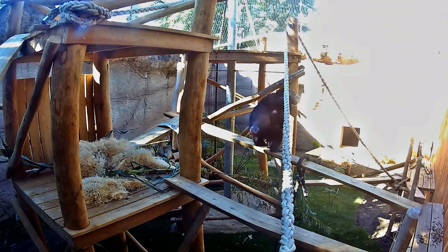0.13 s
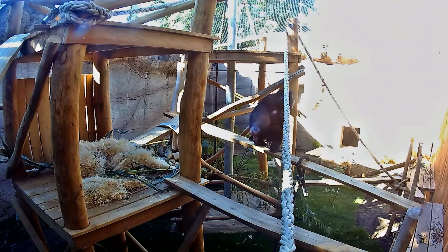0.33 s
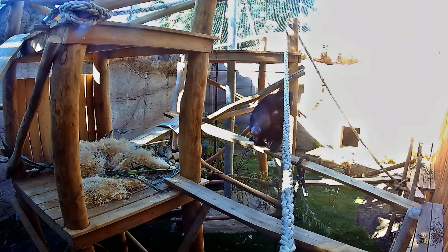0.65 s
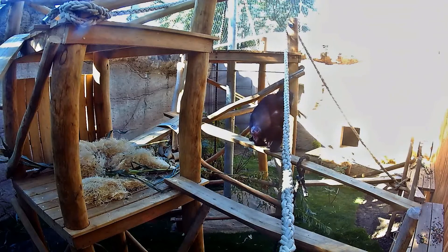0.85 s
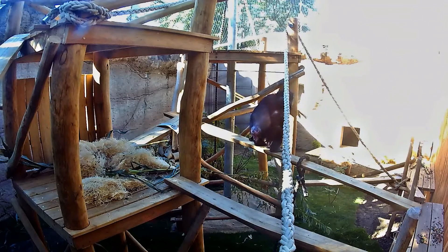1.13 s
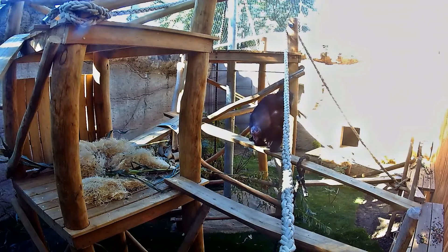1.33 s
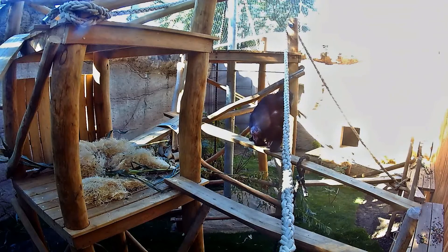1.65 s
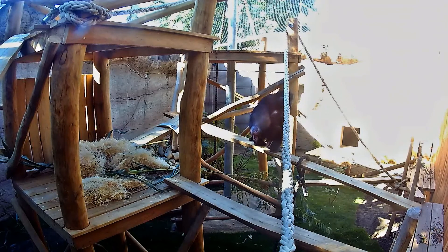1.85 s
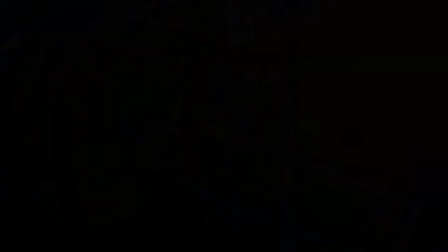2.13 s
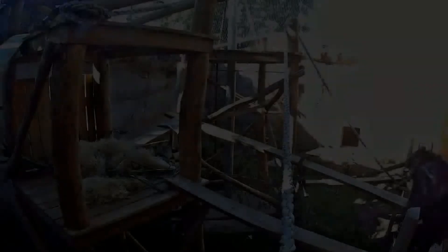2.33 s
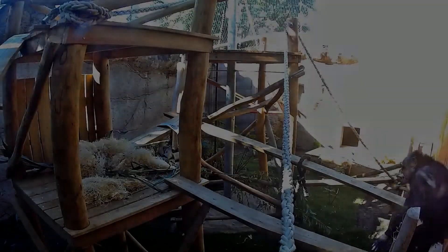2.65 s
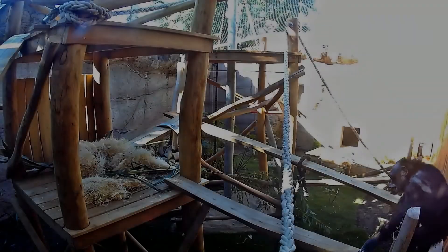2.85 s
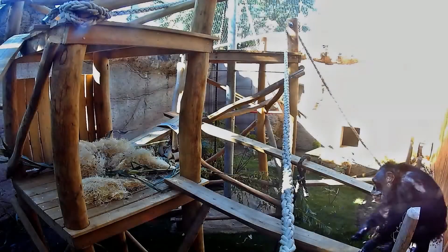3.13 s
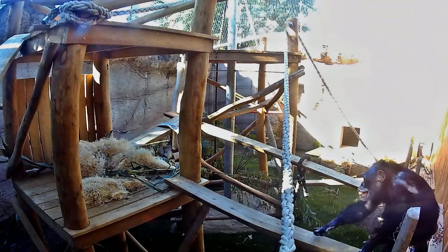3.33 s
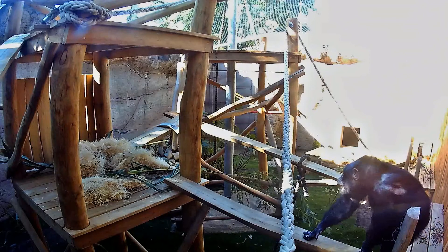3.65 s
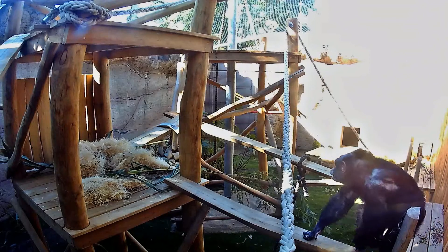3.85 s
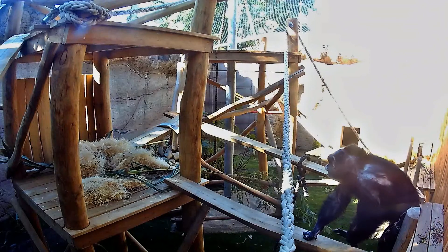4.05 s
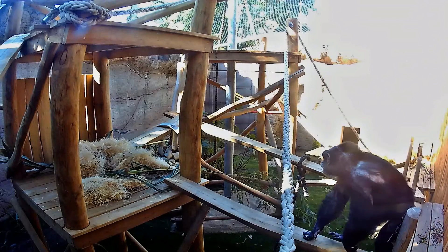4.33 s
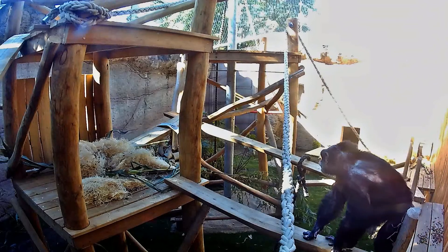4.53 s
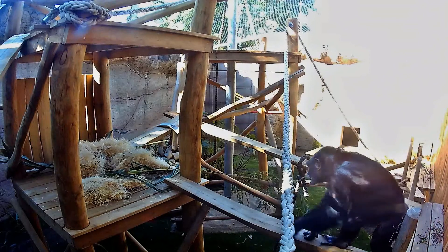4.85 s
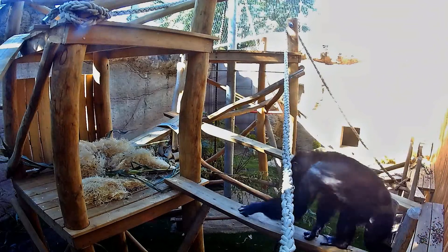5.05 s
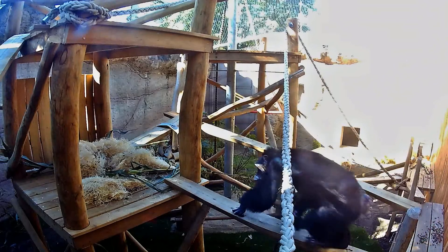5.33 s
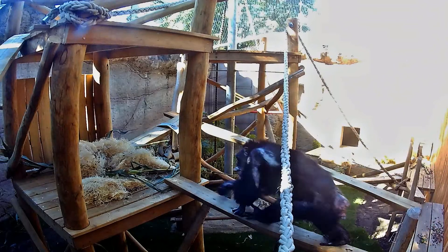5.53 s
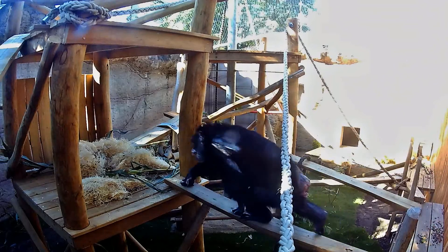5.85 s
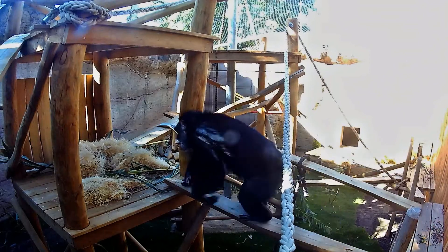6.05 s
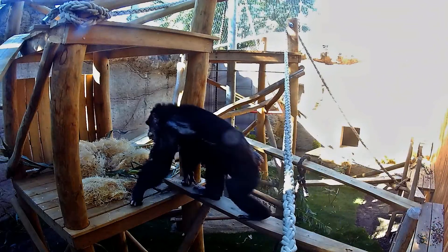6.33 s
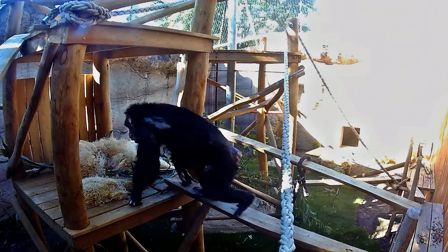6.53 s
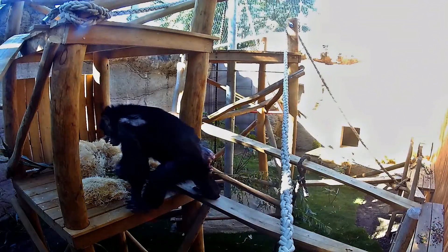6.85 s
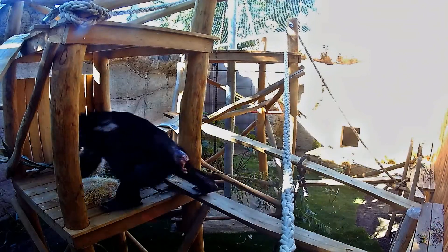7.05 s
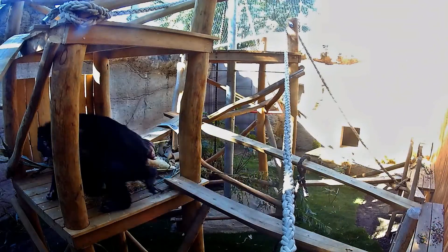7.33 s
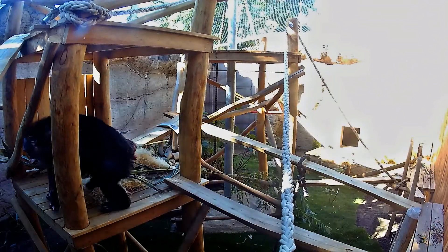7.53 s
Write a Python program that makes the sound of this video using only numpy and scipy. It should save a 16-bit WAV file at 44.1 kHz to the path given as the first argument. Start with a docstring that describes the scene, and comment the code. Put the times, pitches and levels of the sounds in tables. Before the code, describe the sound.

Loud, high chimpanzee screams with raspy, squealing in-breaths ring off hard walls, the strongest ones overloading the microphone over faint outdoor rumble and hiss.

```python
"""Chimpanzee screams in a walled enclosure

Arching harmonic screams alternate with hoarse rasps, bands of tone and noise at the throat's resonances.
Walls return discrete echoes and a diffuse tail; the loudest calls overload the microphone input.
A hard cut shortens one scream: before it the callers are farther off and more reverberant.
Squeals, faint falling tones, a soft knock on wood and electronic pips are heard over rumble and hiss."""
import sys
import numpy as np
from scipy import signal
from scipy.fft import rfft, irfft, next_fast_len
from scipy.io import wavfile
from scipy.ndimage import uniform_filter1d, minimum_filter1d

SR = 44100
rng = np.random.default_rng(int(sys.argv[2]) if len(sys.argv) > 2 else 0)


def transcribe(u):
    """Save the signal u as a 16-bit wav file named by the first command-line argument.

    u: samples, shape (n,) or (channels, n), limited to [-1, 1]; the rate is SR.
    q: integer samples, one column per channel.
    """
    v = np.clip(np.atleast_2d(u).T, -1, 1)
    q = np.round(v * 32767).astype(np.int16)
    wavfile.write(sys.argv[1], SR, q)


N = 339129
CUT_S = 2.128  # the first shot gives way to the second


def amp(db):
    """Logarithmic level: decibels to amplitude gain."""
    return 10 ** (np.asarray(db) / 20)


def unit(x):
    """Normalisation to an rms of 1."""
    return x / np.sqrt(np.mean(abs(x) ** 2) + 1e-20)


def ramp(x):
    """Linear ramp limited to 0-1."""
    return np.clip(x, 0, 1)


def read(points, hz):
    """Interpolation of a spectral table on a log-frequency axis."""
    f, value = np.transpose(points)
    return np.interp(np.log(hz + 1), np.log(f + 1), value)


def add(mix, s, sound):
    """Superposition: adds a sound to the mix at time s, dropping what lies outside."""
    at = round(s * SR)
    sound = sound[max(-at, 0):]
    part = mix[max(at, 0):][:len(sound)]
    part += sound[:len(part)]


def fade(t, edge_s):
    """Sine-squared window edges avoid clicks at start and end."""
    return np.sin(np.pi / 2 * np.clip(np.minimum(t - t[0], t[-1] - t) / edge_s, 0, 1)) ** 2


def noise(size, shape):
    """Spectral shaping: white noise weighted by shape(Hz), at an rms of 1."""
    full = next_fast_len(size + 4096)
    spectrum = rfft(rng.standard_normal(full)) * shape(np.fft.rfftfreq(full, 1 / SR))
    return unit(irfft(spectrum, full)[:size])


def wander(t, rate_hz):
    """Low-pass noise: random drift up to about the given rate."""
    return noise(len(t), lambda hz: 1 / (1 + (hz / rate_hz) ** 4))


def background():
    """Coloured noise: a low outdoor rumble and a soft hiss, gently modulated together."""
    # spectrum of the outdoor rumble: (f/Hz, relative level/dB)
    air_spectrum = [(15, -43.5), (25, -25), (49, 0), (86, -10), (113, -6), (189, -9), (227, -3), (265, -3),
                    (372, -2.5), (455, -7), (523, -12), (1000, -18.5), (1300, -50.5), (2200, -120)]
    # spectrum of the outdoor hiss: (f/Hz, relative level/dB)
    hiss_spectrum = [(700, -24.5), (1000, -14.5), (1400, -3), (1850, 0), (2400, -5.5), (3000, -9),
                     (3500, -19.5), (4200, -25.5), (5200, -35), (6500, -53), (10000, -37.5), (15500, -45)]
    air_db, hiss_db, drone_db = -63, -55, -61.5
    t = np.arange(N) / SR
    air = amp(air_db) * noise(N, lambda hz: amp(read(air_spectrum, hz)))
    hiss = amp(hiss_db) * noise(N, lambda hz: amp(read(hiss_spectrum, hz)))
    drone = amp(drone_db) * noise(N, lambda hz: 1 / (1 + ((hz - 380) / 70) ** 2))
    drone = drone * (t < CUT_S)  # heard in the first shot only
    return (air + hiss + drone) * amp(0.36 * wander(t, 3.9))


def pips():
    """Periodic tone bursts: the circuits whine once a period and rest on every fifteenth."""
    # successive pips of the repeating cycle: (f/Hz)
    pip_hz = [2830, 2840, 2660, 2740, 2750, 2660, 2750, 2750, 2660, 2750, 2750, 2655, 2750, 2760]
    period_s = 1001 / 30000
    t, out = np.arange(0, .021, 1 / SR), np.zeros(N)
    for count in range(int(N / SR / period_s)):
        step = count % (len(pip_hz) + 1)
        if step < len(pip_hz):
            tone = np.sin(2 * np.pi * (pip_hz[step] * t + rng.random()))
            add(out, .0045 + count * period_s, tone * fade(t, .004))
    return amp(-51.5) * out


def knocks():
    """Modal decay: padded blows briefly ring the damped modes of a plank."""
    # soft double knock: (t/s, level/dB before the soft onset)
    blows = [(4.979, -33), (4.995, -37)]
    # modes of the plank: (f/Hz, level/dB, decay time t60/s)
    modes = [(390, 0, .06), (300, -10, .14), (520, -12, .03)]
    t, out = np.arange(SR // 4) / SR, np.zeros(N)
    ring = sum(amp(db - 60 * t / t60) * np.sin(2 * np.pi * hz * t) for hz, db, t60 in modes)
    soft_onset = 1 - np.exp(-t / 0.0066)
    for s, db in blows:
        add(out, s, amp(db) * ring * soft_onset)
    return out


def glide(start, length, first_hz, last_hz, db):
    """Linear frequency sweep: a brief, pure, falling tone."""
    t = np.arange(0, length, 1 / SR)
    hz = first_hz + (last_hz - first_hz) * t / length
    return start, amp(db) * np.sin(2 * np.pi * np.cumsum(hz) / SR) * fade(t, .01)


def squeal(start, length, note_hz, db, swell_db_per_s):
    """Frequency modulation: a thin, unsteady tone slides up, over a weak fundamental an octave below."""
    scoop_hz, scoop_s, edge_s = 88.5, .04, .13
    t = np.arange(0, length, 1 / SR)
    hz = note_hz - scoop_hz * np.exp(-t / scoop_s)
    unsteady_hz = hz * (1 + 0.0016 * wander(t, 150) + 0.0043 * wander(t, 5))
    phase = np.pi * np.cumsum(unsteady_hz) / SR  # of the fundamental, at half the note
    fundamental = amp(-14) * np.sin(phase)
    return start, amp(db + swell_db_per_s * t) * (np.sin(2 * phase) + fundamental) * fade(t, edge_s)


def rasp(t, levels, throat, mouth=1):
    """Chaotic folds drive resonances: each holds a wavering tone inside a band of rattling noise."""
    sound = np.zeros(len(t))
    for db, group in zip(levels, throat):
        for table_hz, width, mode_db, tonal in group:
            centre = table_hz * mouth
            band = noise(len(t), lambda hz: 1 / (1 + ((hz - centre) / width) ** 2) ** 1.3)
            pitch = centre + width * (.35 * wander(t, 15) + 0.28 * wander(t, 200))
            tone = unit(np.sin(2 * np.pi * np.cumsum(pitch) / SR) * amp(4.9 * wander(t, 23)))
            share = np.clip(tonal, 0, 1)  # of the power
            sound += amp(db + mode_db) * (np.sqrt(share) * tone + np.sqrt(1 - share) * band)
    rattle = unit(amp(0.73 * wander(t, 55)))
    passband = signal.butter(12, [1300, 4500], "bandpass", fs=SR, output="sos")
    return signal.sosfilt(passband, sound * rattle * fade(t, 0.015))


def thin_rasp(start, length, low_db, high_db, swell_db_per_s):
    """Exponential growth: a rasp creeps in and swells by a steady number of decibels a second."""
    # low and high group of throat resonances: (f/Hz, width/Hz, level/dB, tonal share 0-1)
    thin_throat = ([(1400, 24, -1.5, 0.99), (1425, 58, 1, 0.13), (1784, 120, 1.5, 0.28),
                    (2180, 240, -10, 0.12)], [(2526, 160, -1, 0.8), (2757, 62, -5, 0.9), (2922, 86, -15, 0),
                    (3700, 540, -31, 0.32), (3945, 79, -25, 0.024)])
    attack_s, onset_db = .05, -7.5
    t = np.arange(0, length, 1 / SR)
    gain_db = swell_db_per_s * t + onset_db * ramp(1 - t / attack_s)
    return start, rasp(t, [low_db + gain_db, high_db + gain_db], thin_throat)


def harsh_rasp(start, length, low_db, high_db, fade_db_per_s, heave_s, heave_rate, mouth):
    """Amplitude modulation: a rasp bursts out and decays in heaves."""
    # low and high group of throat resonances: (f/Hz before the mouth factor, width/Hz, level/dB,
    #                                           tonal share 0-1)
    harsh_throat = ([(1404.4, 65.4, -2, 0.78), (1760, 150, -4, 1), (1981, 180, -12.5, 1)],
                     [(2600, 220, -5, 1), (2808, 198.7, -5.5, 0.7), (4200, 560, -29, 1)])
    attack_s, onset_db = 0.031, -12.5
    release_s, end_db = .12, -10.5
    low_heave_db, high_heave_db = 5, 2.5  # swing to either side
    t = np.arange(0, length, 1 / SR)
    heave = np.cos(2 * np.pi * heave_rate * (t - heave_s))
    gain_db = onset_db * ramp(1 - t / attack_s) - fade_db_per_s * t
    gain_db = gain_db + end_db * ramp(1 - (length - t) / release_s)
    low = low_db + gain_db + low_heave_db * heave
    high = high_db + gain_db + high_heave_db * heave
    return start, rasp(t, [low, high], harsh_throat, mouth)


def throb(t):
    """Amplitude modulation: a quick pulsing of loudness."""
    # stretches that throb: (start t/s, end t/s, rate f/Hz, depth 0-1)
    stretches = [(4.52, 4.573, 45.5, 0.46), (6.554, 6.612, 29.3, 0.95), (6.785, 6.898, 48.2, 0.69)]
    gain = np.ones(len(t))
    for start, end, rate, depth in stretches:
        inside = np.clip(np.minimum(t - start, end - t) / .005, 0, 1)
        gain *= 1 + np.clip(depth, 0, 1) * inside * (np.cos(2 * np.pi * rate * (t - start)) - .2)
    return gain


def surge(t):
    """Raised-cosine level changes: the voice surges or catches in its second and third harmonics, in dB."""
    # brief surges and dips: (middle t/s, length/s, second harmonic level/dB, third harmonic level/dB)
    moments = [(0.778, 0.027, 8.5, -3.5), (1.859, .04, 6, -1), (1.965, 0.029, 5, 1), (2.03, 0.12, 5, 1),
               (2.099, 0.042, 5.5, -4), (2.363, 0.032, 7.5, 7), (2.385, 0.053, -12, 6.5),
               (2.411, 0.033, 10.5, 6), (3.4, .055, 10.5, -8), (3.431, 0.041, -12, 5.5),
               (4.551, .05, -4, 1.5), (4.624, 0.044, 0.5, 5), (5.711, .04, 2.5, 5.5),
               (5.759, 0.085, -9.5, 0), (5.821, 0.025, -1, 4), (5.855, 0.025, 4.5, 2),
               (6.583, 0.02, 1, 0.5), (6.621, .04, 3.5, -3.5), (6.69, 0.071, -7, -4),
               (6.738, 0.067, 7.5, 0.5), (6.773, .03, -6, 1), (6.831, .09, 5, 5.5),
               (6.918, 0.064, 10.5, 1.5)]
    total_db = 0
    for middle, length, *db in moments:
        bump = np.cos(np.pi * np.clip((t - middle) / length, -.5, .5)) ** 2
        total_db = total_db + np.outer([0, *db], bump)  # the fundamental stays as it is
    return total_db


def arch(t, first_hz, top_hz, last_hz, top_s, lateness):
    """Pitch contour: it climbs to a top, tips over and falls, and sags as the breath runs out."""
    rise_power, sag_hz, sag_s = 1.6, 69, .035
    climb = ramp(1 - t / max(top_s, 1 / SR)) ** rise_power
    fall = np.sin(np.pi / 2 * ramp((t - top_s) / (t[-1] - top_s)) ** lateness) ** 2
    sag = sag_hz * ramp(1 - (t[-1] - t) / sag_s)
    return top_hz - (top_hz - first_hz) * climb - (top_hz - last_hz) * fall - sag


def scream(row, roughness):
    """Source and filter: harmonics sweep through the throat; strained folds jitter and flutter chaotically."""
    # resonances of throat and mouth: (f/Hz, level/dB)
    throat_peaks = [(550, -15), (700, -19), (850, -30.5), (1050, -25), (1250, -19), (1400, -3),
                    (1550, -7.5), (1660, -12), (1750, 2.5), (1900, 3.5), (2100, 0.5), (2320, -7),
                    (2480, 9.5), (2620, -6.5), (2800, -4.5), (3200, -19.5)]
    # overtones above the third, against the strength of the lower harmonics: (f/Hz, level/dB)
    overtones = [(2400, -18.5), (3100, -21.5), (3500, -47), (4000, -27.5), (4300, -42.5), (5100, -54),
                 (5800, -62.5), (7000, -85)]
    edge_db = -19  # level at the very start and end, against the middle
    purity = 0.81  # a surging harmonic locks onto its resonance: dB less roughness per dB of surge
    pure_db, pure_below = -3.5, .09  # pure screams, below this roughness, have overtones weaker by up to this
    weak_flutter = 1.3  # factor for all harmonics but the second, which is the steadiest
    start, length, level_db, third_db, attack_s, release_s, *pitch = row
    clean, broken, breaks_at = roughness
    t = np.arange(0, length, 1 / SR)
    hz = arch(t, *pitch)
    effort_db = level_db + edge_db * (ramp(1 - t / attack_s) + ramp(1 - (length - t) / release_s))

    rough = clean + (broken - clean) * ramp((t / length - breaks_at) / (1 - breaks_at))
    surge_db = surge(start + t)
    locking_db = np.maximum(surge_db.max(0), 0) * (rough < .3)  # only a voice that has not broken up
    rough = rough * amp(-purity * locking_db)
    jitter = .055 * rough * wander(t, 240) + 0.0052 * wander(t, 46)
    phase = 2 * np.pi * np.cumsum(hz * (1 + jitter)) / SR

    resonance_db = [read(throat_peaks, hz), read(throat_peaks, 2 * hz), read(throat_peaks, 3 * hz) + third_db]
    levels = list(effort_db + np.array(resonance_db) + surge_db)
    strength_db = levels[1] + .24 * (levels[2] - levels[1]) + pure_db * ramp(1 - clean / pure_below)
    for k in range(4, 9):  # the overtones come and go
        levels.append(strength_db + read(overtones, k * hz) + 5 * wander(t, 45))

    voice = np.zeros(len(t))
    for k, db in enumerate(levels, 1):
        spread_hz = 110 * min(k, 3)
        # complex noise smears each harmonic into a band
        flutter = 0.88 * rough * (wander(t, spread_hz) + 1j * wander(t, spread_hz))
        flutter = flutter * (1 if k == 2 else weak_flutter)
        voice += amp(db) * (unit(1 + flutter) * np.exp(1j * k * phase)).real
    # the hoarsest stretches also roar around 1170 Hz
    roar = noise(len(t), lambda f: 1 / (1 + ((f - 1170) / 130) ** 4))
    voice = voice + amp(levels[1] - 9.5) * rough ** 3 * roar
    return start, voice * throb(start + t) * fade(t, edge_s=0.0083)


def hold(x, limit):
    """Peak limiting: turns the gain down within 2 ms wherever the peaks pass the limit."""
    peak = -minimum_filter1d(-abs(x), size=90)
    return x / uniform_filter1d(np.maximum(peak / limit, 1), size=90)


def enclosure(x, tail_db, spill):
    """Room response by convolution: direct sound, a few wall echoes and a diffuse tail of sparse taps."""
    # reflections off nearby walls: (delay t/s, level/dB before the send gain)
    echoes = [(0.0185, -5.5), (0.029, -20.5), (0.048, -20), (0.065, -14)]
    # decay of the enclosure: (f/Hz, decay time t60/s)
    decay = [(300, 0.56), (700, 0.72), (1500, 0.75), (2500, 0.55), (4000, 0.53), (8000, 0.19)]
    # send gain, rising at the close of the long scream, end values held: (t/s, level/dB)
    room_send = [(6.82, 2), (6.91, 5), (6.95, 2), (6.999, -0.5)]
    taps = np.zeros(SR)
    at = np.arange(600, SR - 20, 20)
    taps[at + rng.integers(0, 20, len(at))] = rng.choice([-1., 1.], len(at))
    hz, t, z = signal.stft(taps, SR, nperseg=256)
    build_up = 1 - np.exp(-t / 0.024)
    decay_gain = amp(-60 * t / read(decay, hz)[:, None])
    tail = signal.istft(z * build_up * decay_gain, SR, nperseg=256)[1]
    response = amp(tail_db) * tail / np.linalg.norm(tail)
    for delay, db in echoes:
        response[round(delay * SR)] += amp(db)
    send = amp(np.interp(np.arange(N) / SR, *np.transpose(room_send)))
    # the strongest swells are beamed at the microphone and spill little more into the enclosure
    return x + signal.fftconvolve(hold(x, spill) * send, response)[:N]


def scene():
    """Superposition of sources in two shots joined by a hard cut, the first farther off and more reverberant."""
    # screams: (start t/s, length/s, level/dB, third harmonic extra level/dB, attack/s, release/s,
    #           first pitch f/Hz, top pitch f/Hz, last pitch f/Hz before the sag, time to the top/s,
    #           lateness of the fall as a power)
    screams = [ (0.567, 0.26, -16, -21, 0.046, 0.056, 893.4, 1031, 678, 0.12, 1.7),
               (1.719, 0.43, -12.5, -7, 0.058, .01, 939, 1070, 1122, 0.14, 1.07),
               (2.312, 0.22, -8, -6.5, 0.022, 0.095, 735.4, 847.6, 684, .062, 1),
               (3.344, 0.23, -9.5, -10.5, 0.015, 0.093, 849, 872.2, 677.5, 0.044, 1.44),
               (4.499, .21, -20, -6.5, 0.0074, 0.1, 876, 834.7, 623, .004, .93),
               (5.632, 0.26, -14, -13, 0.029, 0.057, 830.7, 874.6, 644, 0.099, 1.65),
               (6.499, .5, -9, -13.5, 0.024, 0.036, 857.2, 1017, 681, 0.35, 1.42), ]
    # breaking up of each scream: (roughness at first 0-1, at the end 0-1, share of length before it breaks)
    breakups = [(.14, .36, .7), (.18, .75, .22), (.04, .35, .55), (.03, .35, .55), (.02, .2, .1),
                (.03, .33, .65), (.09, .4, .86)]
    # faint falling tones, a squeak and a moan: (start t/s, length/s, first f/Hz, last f/Hz, level/dB)
    glides = [(.22, .075, 3990, 3590, -55), (5.9, .15, 565, 515, -59)]
    # harsh rasps: (start t/s, length/s, low resonances level/dB, high ones level/dB, fade/(dB/s),
    #               first heave/s after the start, heave rate f/Hz, mouth opening as a factor on the resonances)
    harsh_rasps = [ (-.04, .46, -21.5, -28, 47, 0.05, 9, 1.024), (.476, 0.35, -23, -29, 8, .06, 4.1, 1.007),
                   (1.085, .5, -24, -28.5, 29.5, 0.04, 5.7, .992),
                   (1.724, 0.48, -21.5, -27.5, 18.5, 0.13, 7.4, 0.99), ]
    # thin rasps, swelling: (start t/s, length/s, low resonances level/dB, high ones level/dB, swell/(dB/s))
    thin_rasps = [(2.057, 0.31, -45.5, -38.5, 27), (3.066, 0.3, -45.5, -38, 32.5),
                  (6.17, .4, -44.5, -40.5, 28), (7.385, 0.29, -45, -41.5, 40)]
    # squeals riding on the thin rasps: (start t/s, length/s, octave f/Hz, level/dB, swell/(dB/s))
    squeals = [(2.07, 0.32, 2455, -44.5, 71), (3.08, 0.2, 2460, -20.5, -28.5),
               (6.17, 0.36, 2475, -32.5, 14.5), (7.39, 0.4, 2420, -35.5, 2)]
    before, after = np.zeros(N), np.zeros(N)
    calls = [scream(row, roughness) for row, roughness in zip(screams, breakups)]
    calls += [glide(*row) for row in glides]
    calls += [harsh_rasp(*row) for row in harsh_rasps]
    calls += [thin_rasp(*row) for row in thin_rasps]
    calls += [squeal(*row) for row in squeals]
    for s, sound in calls:
        middle_s = s + len(sound) / SR / 2
        add(before if middle_s < CUT_S else after, s, sound)
    t = np.arange(N) / SR
    before = before * fade(t, .006)
    first_shot = enclosure(before, tail_db=-5.0, spill=0.38)
    second_shot = enclosure(after, tail_db=-12.0, spill=0.43)
    voices = np.where(t < CUT_S, first_shot, second_shot)
    return (voices + knocks() + background() + pips())[None]


def record(dry):
    """Nonlinear distortion: a limiter holds peaks, the input rounds them, its bias thumps; then band limiting."""
    held = hold(dry[0], limit=0.98)
    ceiling, knee = .95, 13.0
    driven = held / (1 + abs(held / ceiling) ** knee) ** (1 / knee)
    shaved = abs(held - driven)
    thump_band = signal.butter(1, [30, 140], "bandpass", fs=SR, output="sos")
    bias = signal.sosfilt(thump_band, shaved)
    ragged = bias * (1 + 1.2 * wander(held, 450))
    bias = signal.sosfilt(signal.butter(4, 1200, fs=SR, output="sos"), ragged)
    dip = signal.lfilter(*signal.iirpeak(8700, 2.2, fs=SR), driven)  # the treble has a broad hollow
    edge = signal.firwin(511, 15830, window=("kaiser", 9), fs=SR)  # low-pass
    return signal.oaconvolve(driven - 0.83 * dip + amp(3.0) * bias, edge, "same")[None]


dry = scene()
out = record(dry)
transcribe(out)
```